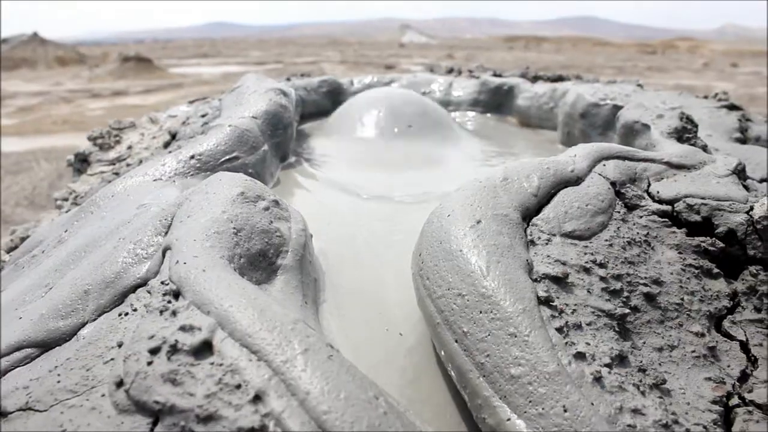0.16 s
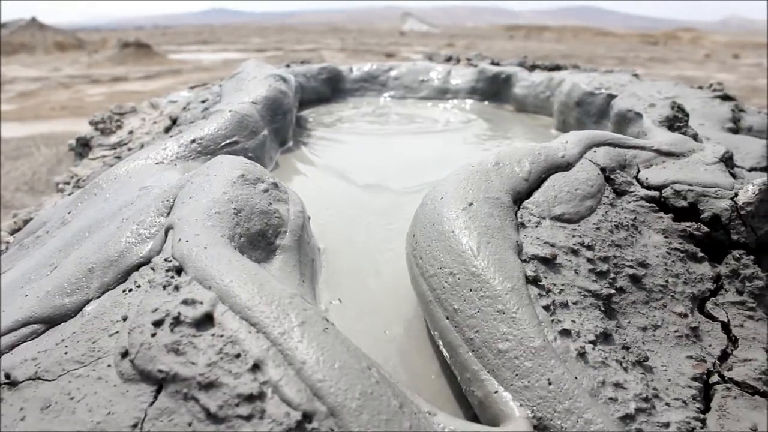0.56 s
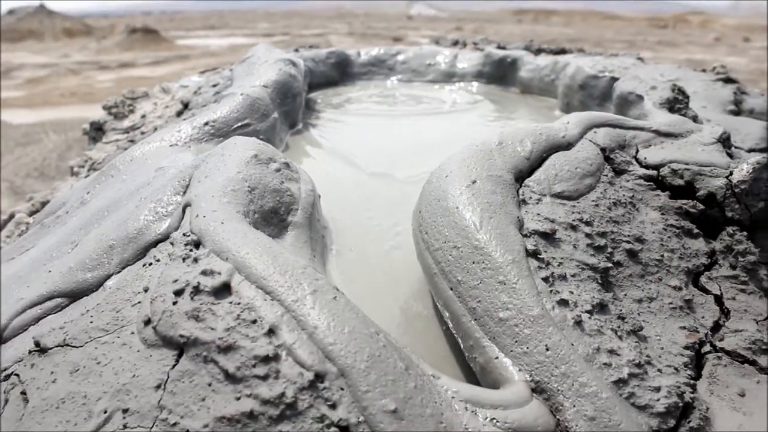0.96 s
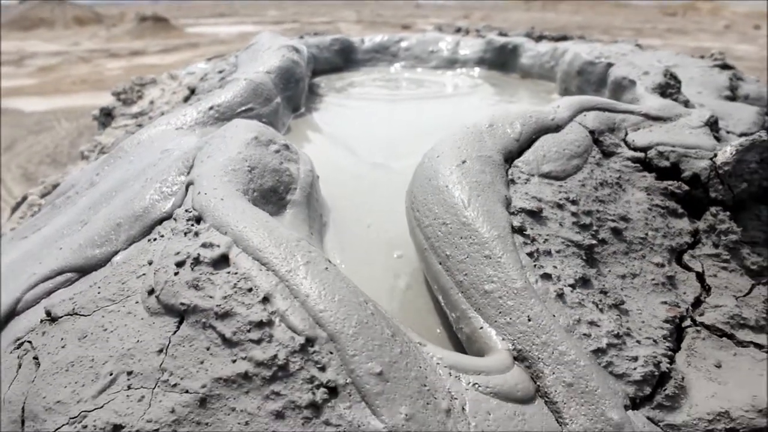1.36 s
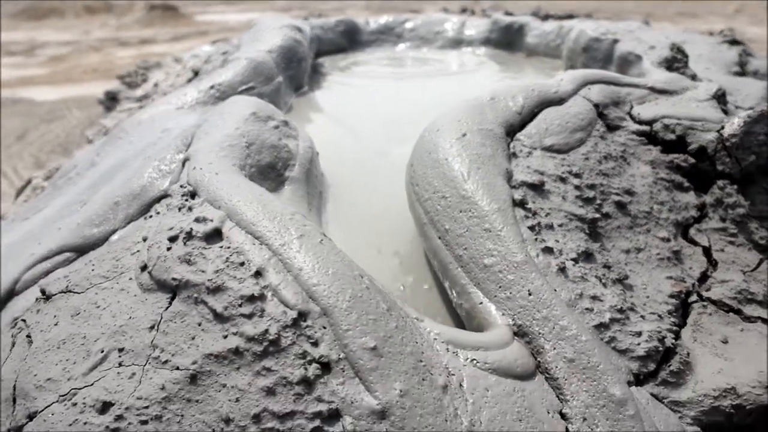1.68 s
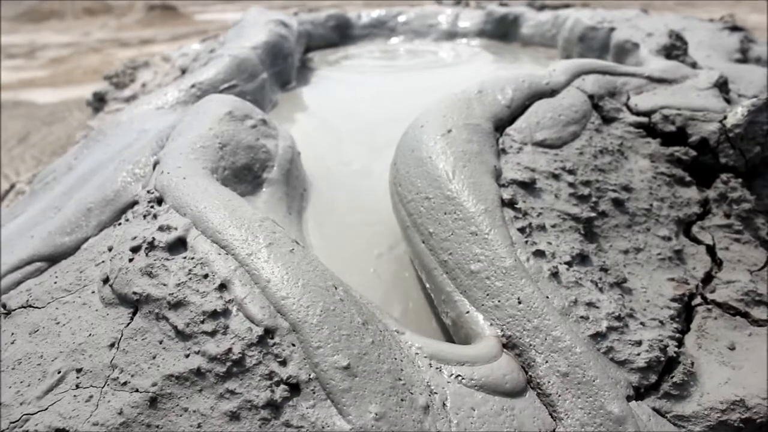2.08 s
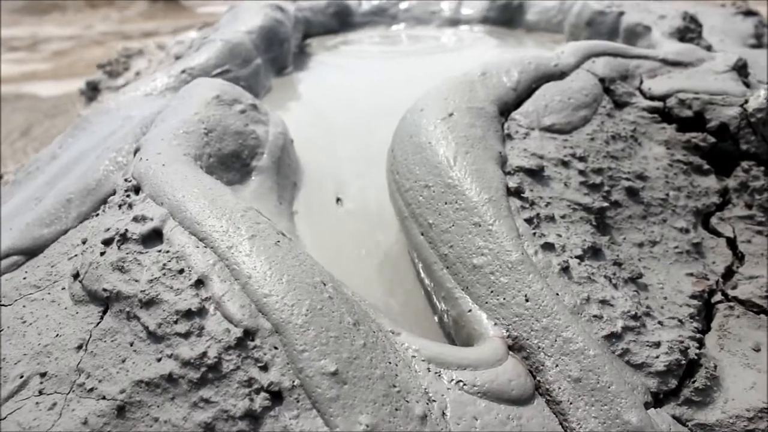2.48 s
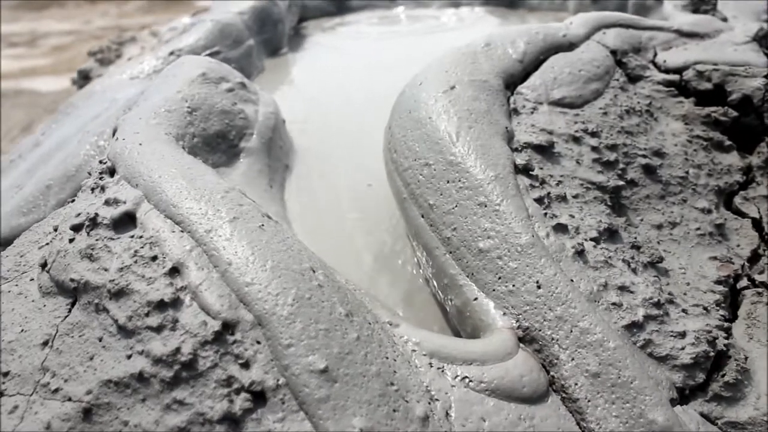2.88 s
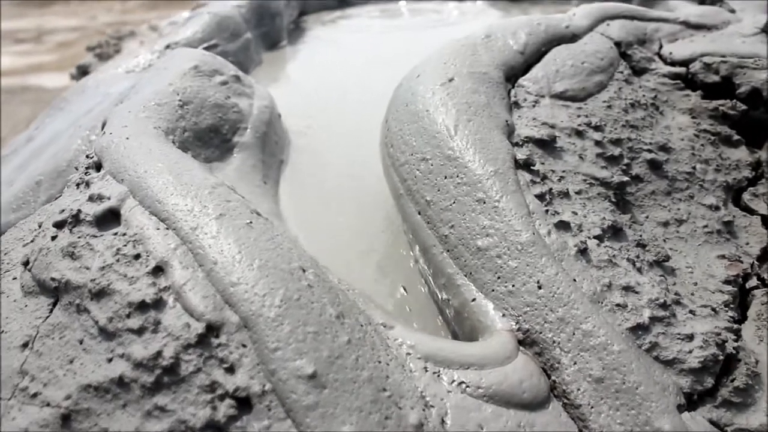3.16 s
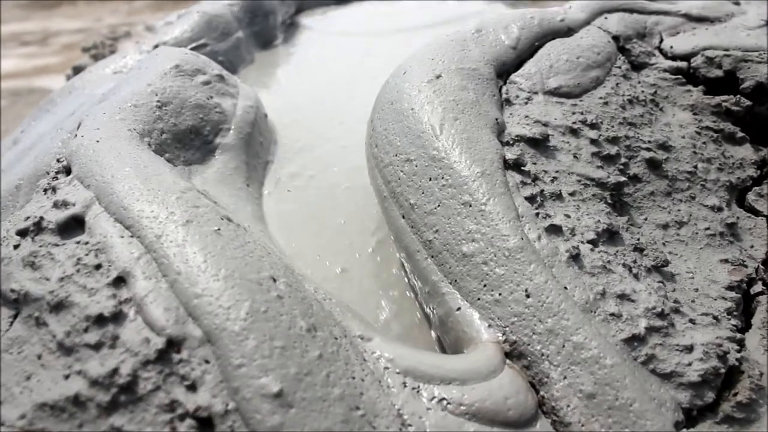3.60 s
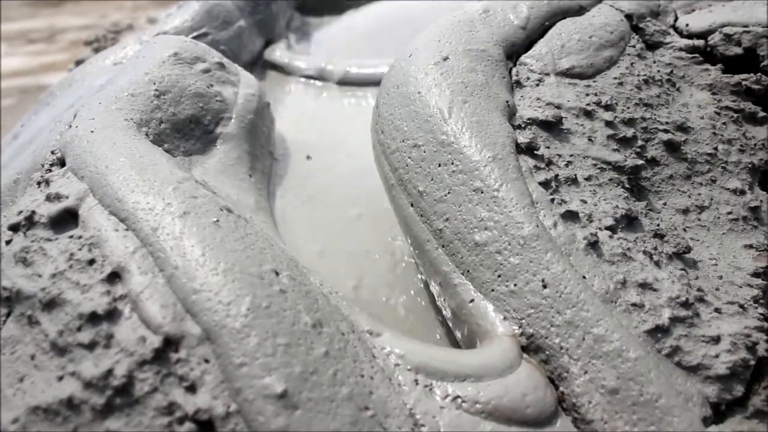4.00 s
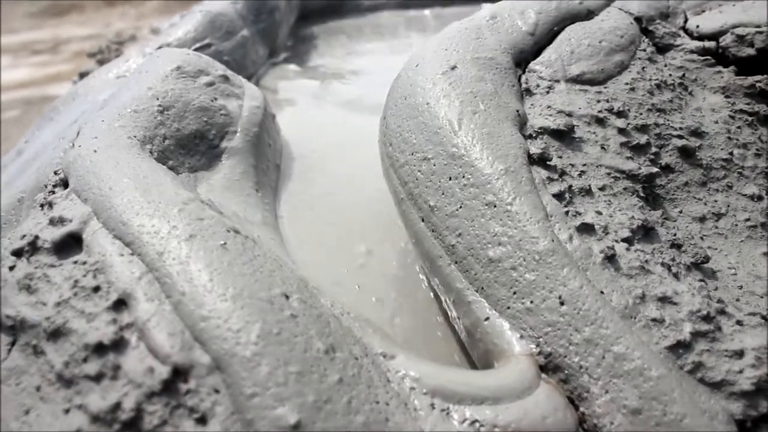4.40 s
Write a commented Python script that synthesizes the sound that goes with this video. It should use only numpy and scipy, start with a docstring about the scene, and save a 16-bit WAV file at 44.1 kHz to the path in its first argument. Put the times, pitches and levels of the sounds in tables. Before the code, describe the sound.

Liquid mud pool fizzes faintly over a low outdoor rumble, with sparse wet pops and one loud, crackling bubble burst near the end.

```python
"""A low rumble of outdoor air with a far hum runs throughout, under the fizz of a pool of liquid mud,
heard from close by in its small crater. Pops and gulps are pitched tones, drips are longer-ringing pops;
domes tear in sprays of random snaps, and gas sighs as a sputter of tiny ringing bubbles.
Fingers tap and rub the case of the hand-held microphone, which rings in its own modes. A thin tone
wavers faintly, breeze puffs in the bass, and the crater rim scatters back a short, dull tail."""
import sys
import numpy as np
from scipy import signal
from scipy.fft import rfft, irfft
from scipy.io import wavfile

SR = 44100
rng = np.random.default_rng(int(sys.argv[2]) if len(sys.argv) > 2 else 0)


def inscribe(sig):
    """Save sig as 16-bit PCM at rate SR to the path in sys.argv[1].

    A 1-D sig is mono; a 2-D sig holds one channel per row.
    Samples are clipped to [-1, 1] before scaling.
    """
    pcm = np.round(np.clip(np.atleast_2d(sig).T, -1, 1) * 32767)
    wavfile.write(sys.argv[1], SR, pcm.astype(np.int16))


N = 200302
TIME = np.arange(N) / SR
CUTOFF_HZ = 15950   # top of the microphone's range

# All event levels are before the crater and the microphone; rms levels are at the top of the arch.
# Spectrum of the open air. Each row: frequency in Hz, relative level in dB.
AIR_COLOUR = [(25, -12), (50, -2.5), (62, -3), (80, -5.5), (120, 0.5), (180, 0.5), (235, -6.5), (320, -11),
              (480, -19), (650, -17.5), (900, -20), (1600, -21.5), (2800, -24), (5000, -26.5),
              (9000, -28.5), (13000, -32), (16000, -33.5)]
# Far hum in the rumble. Each row: centre in Hz, bandwidth in Hz, rms level in dB.
HUM_BANDS = [(130, 14, -60.5), (162.4, 7.8, -63.5), (224.3, 18, -66.5)]
# Liveliness of the surface fizz. Each row: time in seconds, drive level of the ticks in dB.
FIZZ_LEVELS = [(0, -44.5), (.7, -44), (2.2, -44), (2.7, -49.5), (3.6, -42.5), (3.86, -34.5), (4.15, -47),
               (4.54, -43)]
# Gas pockets snapping open, from dry ticks to ringing drips. Each row: start in seconds, peak level
# in dB, starting pitch in Hz, ring length to -60 dB in cycles of that pitch.
POPS = [(.0499, -39, 7000, 20), (.213, -23, 14000, 35), (.2487, -30, 9500, 41), (0.25, -30, 3650, 40),
        (0.2576, -18.5, 7650, 9.2), (.747, -30, 2800, 25), (0.751, -33.5, 3930, 34), (.771, -36, 2700, 17),
        (0.771, -34, 1400, 13), (0.7926, -36.5, 910, 7.6), (.876, -42, 7750, 45), (.9541, -40.5, 1730, 19),
        (1.342, -37.5, 5300, 6.3), (2.2994, -28.5, 7650, 7.8), (2.3481, -18, 8260, 11),
        (2.383, -32, 7000, 10), (2.4432, -44, 1900, 12), (2.6047, -22.5, 7900, 5.6),
        (3.3945, -32.5, 8060, 14), (3.401, -18.5, 14800, 13), (3.4708, -35, 7600, 18),
        (3.579, -27.5, 13200, 4.3), (3.5863, -26, 14000, 9.3), (3.6935, -23, 15200, 32),
        (3.745, -21.5, 2870, 14), (3.7495, -15.5, 4870, 3), (3.7542, -17, 3660, 4.9),
        (3.805, -25.5, 8550, 26), (3.828, -9.5, 9900, 8.5), (3.8331, -11, 8550, 3.8),
        (3.8613, -20.5, 1570, 14), (3.8611, -17, 3420, 27), (3.877, -15.5, 636, 3.5),
        (3.8778, -6.5, 13000, 5.8), (3.8823, -20.5, 710, 5.4), (3.8842, -9.5, 2380, 11),
        (3.8859, -5, 13800, 25), (3.887, -11.5, 11300, 16), (3.9011, -25, 1860, 17),
        (4.0488, -29, 12800, 18)]
# Fingers tapping the case. Each row: start in seconds, click level in dB, settling time in ms.
TAPS = [(0.096, -48, 15), (2.5028, -47.5, 35), (2.722, -43, 13), (3.123, -39, 5.2), (3.4051, -40, 7.9),
        (3.59, -38, 21), (4.063, -32, 21)]
# Modes of the microphone case. Each row: pitch in Hz, gain in dB, decay time to -60 dB in ms.
CASE_MODES = [(1350, -30, 15), (1598, -6, 35), (1870, -5, 7.6), (2700, 3, 12.7), (3650, -29, 6)]
# Spectrum of skin on the case. Each row: frequency in Hz, relative level in dB.
RUB_COLOUR = [(500, -9.5), (900, -6.5), (1550, 3.5), (2200, -2.5), (2650, 5), (3400, -15), (5000, -12),
              (9000, -13.5)]
# Large cavities ringing under the mud. Each row: start in seconds, peak level of the main tone in dB,
# first pitch in Hz, last pitch in Hz, length in ms, overtone level against the main tone in dB.
GULPS = [(0.1832, -40.5, 350, 900, 18.4, -15), (.765, -43.5, 430, 820, 15, -4),
         (3.1829, -22.5, 207, 214, 19.8, -14.5), (3.2624, -31.5, 253, 370, 14.7, 0),
         (3.3831, -45, 380, 520, 7, -17), (3.753, -41, 188, 237, 22.5, -18),
         (3.770, -33.5, 253, 490, 18.5, -10), (3.876, -32, 399, 475, 11.45, -13)]
# Mud skin tearing into spray. Each row: start in seconds, rms level in dB, length in ms,
# treble tilt in dB per octave.
SPRAYS = [(.237, -57, 10, 3), (0.2521, -41, 9, 1.5), (0.291, -45, 8.3, -0.5), (0.5593, -49, 11, -2.5),
          (0.682, -43.5, 6.4, 1), (0.7466, -34, 9, 0.5), (2.386, -49, 7.9, -2.5), (2.4405, -48, 7.1, 3.5),
          (2.597, -51, 20, 0), (2.873, -50.5, 9, -1), (3.3628, -48, 11.4, 2), (3.7486, -32.5, 15, 1.5),
          (3.77, -41, 6.2, -4.5), (3.826, -30.5, 16.7, 1.5), (3.850, -29.5, 10, 1), (3.858, -24, 11.7, 0.5),
          (3.867, -21.5, 11, 13.5), (3.8808, -20, 11.4, 2.3)]
# Spectrum of spray before its tilt. Each row: frequency in Hz, relative level in dB.
SPRAY_COLOUR = [(300, 0), (700, -1), (1100, 0.5), (2400, 2.5), (4000, 0.5), (6500, -0.5), (10000, -1),
                (15000, -1.5)]
# Spectrum of bubbles freed by a tear. Each row: frequency in Hz, relative level in dB.
FREED_COLOUR = [(300, -7), (900, -8.5), (1500, 1), (2200, 5), (3400, -3), (5000, 0), (10000, -16)]
# Soft rushes of escaping gas. Each row: start in seconds, rms level in dB, length in ms.
SIGHS = [(.750, -49.5, 70), (.952, -48, 107), (1.17, -56, 150), (1.245, -49.5, 115), (1.38, -45, 110),
         (1.78, -58.5, 56), (3.765, -53, 200)]
# Spectrum of the sighs. Each row: frequency in Hz, relative level in dB.
SIGH_COLOUR = [(150, -1), (350, 0), (700, 0.5), (1000, -2), (1500, 4.5), (2000, -3.5), (3500, -6.5),
               (6500, -13), (10000, -18), (16000, -34)]
# A thin, faint tone. Each row: start in seconds, rms level in dB, length in ms.
WHINE = [(1.3, -71, 1200)]
# Puffs of breeze. Each row: start in seconds, rms level in dB, length in ms.
BREEZE_PUFFS = [(1.52, -49, 27), (2.69, -52, 220), (4.39, -50, 165)]
# Spectrum of the breeze. Each row: frequency in Hz, relative level in dB.
BREEZE_COLOUR = [(25, -10), (60, -2), (110, -7), (250, -9.5), (700, -49)]
# Fingers sliding on the case. Each row: start in seconds, rms level in dB, length in ms.
RUBS = [(2.475, -54.5, 245), (2.677, -56.5, 56), (3.05, -60.5, 130)]


def from_db(db):
    """Decibels to gain."""
    return 10 ** (np.asarray(db) / 20)


def rms_one(x):
    """Scale to unit rms."""
    return x / np.sqrt(np.mean(x ** 2) + 1e-20)


def seconds(ms):
    """Milliseconds to seconds."""
    return ms / 1000


def add(out, s, sound):
    """Mix a sound in at s seconds."""
    at = max(round(s * SR), 0)
    out[at:at + len(sound)] += sound[:max(N - at, 0)]


def coloured(x, points, tilt_db=0):
    """Give x a smooth spectrum, tilted in dB per octave; rms 1."""
    hz, level_db = np.transpose(points)
    octave = np.log2(np.maximum(np.fft.rfftfreq(len(x), 1 / SR), 10))
    curve_db = np.interp(octave, np.log2(hz), level_db) + tilt_db * octave
    return rms_one(irfft(rfft(x) * from_db(curve_db), len(x)))


def ring(clicks, hz, t60):
    """A damped resonance: a unit click sets off a sine of height 1, down 60 dB after t60 seconds."""
    r = from_db(-60 / (t60 * SR))
    w = 2 * np.pi * hz / SR
    return signal.lfilter([0, np.sin(w)], [1, -2 * r * np.cos(w), r * r], clicks + 1e-18)


def grains(per_s, spread_db):
    """Random clicks of either sign, many small and a few large."""
    sizes = from_db(spread_db * np.minimum(rng.exponential(1, N), 3))
    struck = rng.random(N) < per_s / SR
    return sizes * rng.choice([-1, 1], N) * struck


def swell(ms, skew):
    """One arch of loudness; a skew under 1 brings its top forward."""
    progress = np.linspace(0, 1, max(round(seconds(ms) * SR), 8))
    return np.sin(np.pi * progress ** skew)


def swells(rows, skew):
    """A level curve made of arches."""
    out = np.zeros(N)
    for s, db, ms in rows:
        add(out, s, from_db(db) * swell(ms, skew))
    return out


def glide(first_hz, last_hz, ms, skew):
    """A sine that slides between two pitches under one arch."""
    arch = swell(ms, skew)
    hz = np.geomspace(first_hz, last_hz, len(arch))
    return arch * np.sin(2 * np.pi * np.cumsum(hz) / SR)


def flicker(per_s, spread_db):
    """A gain that wanders at random; rms 1."""
    wander = coloured(rng.standard_normal(N), [(per_s, 0), (4 * per_s, -80)])
    return rms_one(from_db(spread_db * wander))


def crackle(per_s, cycles, pitch_count=14):
    """Random grains, each ringing for a few cycles at one of many pitches, the high ones more often."""
    pitches = np.geomspace(300, 9000, pitch_count)
    odds = np.sqrt(pitches) / np.sqrt(pitches).sum()
    dealt = rng.choice(pitch_count, N, p=odds)
    clicks = grains(per_s, spread_db=3.0)
    out = np.zeros(N)
    for k, hz in enumerate(pitches):
        out += np.sqrt(hz) * rms_one(ring(clicks * (dealt == k), hz, cycles / hz))
    return rms_one(out)


def rumble(rms_db=-52.5):
    """Open air as steady noise: low rumble and faint hiss."""
    return from_db(rms_db) * coloured(rng.standard_normal(N), AIR_COLOUR)


def far_hum():
    """Noise through narrow resonances gives a distant, unsteady hum."""
    out = np.zeros(N)
    for hz, width_hz, db in HUM_BANDS:
        t60 = np.log(1000) / (np.pi * width_hz)   # a narrower band rings longer
        out += from_db(db) * rms_one(ring(rng.standard_normal(N), hz, t60))
    return out


def fizz(mean_per_s=130, doubling_db=5, low_cut_hz=12000, hz=13800, t60_ms=0.43):
    """Pinhead bubbles tick high in the treble; each rise of doubling_db also doubles their rate."""
    db = np.interp(TIME, *np.transpose(FIZZ_LEVELS))
    per_s = mean_per_s * 2 ** ((db - db.mean()) / doubling_db)
    ticks = grains(per_s, spread_db=5.5) * from_db(db)
    high_pass = signal.butter(2, low_cut_hz, "high", fs=SR, output="sos")
    return ring(signal.sosfilt(high_pass, ticks), hz, seconds(t60_ms))


def stray_pops(per_s=2, mid_db=-34.5, spread_db=4, low_hz=7000, high_hz=14000, cycles=5.8, count=60):
    """Faint ticks all over the pool at random moments and pitches, as rows like those of POPS."""
    gap, size, pitch = rng.random((count, 3)).T
    times = np.cumsum(-np.log(1 - gap)) / per_s
    levels_db = mid_db + spread_db * (2 * size - 1)
    pitches = low_hz * (high_hz / low_hz) ** pitch
    return [(s, db, hz, cycles) for s, db, hz in zip(times, levels_db, pitches) if s < N / SR]


def pops(rise=0.12, opening_cycles=0.31):
    """Each pocket opens within a cycle and rings for a few, its pitch rising as the hole widens."""
    out, t = np.zeros(N), TIME[:SR // 30]
    for s, db, hz, cycles in POPS + stray_pops():
        age = t * hz / cycles   # 1 when the ring is down 60 dB
        phase = 2 * np.pi * np.cumsum(hz * (1 + rise * np.minimum(age, 1))) / SR
        opening = 1 - np.exp(-t * hz / opening_cycles)
        pop = opening * from_db(-60 * age) * np.sin(phase)
        add(out, s, from_db(db) * pop / np.max(np.abs(pop)))
    return out


def finger_friction():
    """Skin dragging over the case: a dense crackle in the colour of the rubs; rms 1."""
    return coloured(crackle(per_s=2500, cycles=7.3), RUB_COLOUR)


def case_taps(settle_db=-15, scuff_db=-14):
    """A fingertip's click and tiny settling slips ring the modes of the case, with a scuff of skin."""
    clicks = np.zeros(N)
    for s, db, _ in TAPS:
        add(clicks, s, from_db([db]))
    settling = swells(TAPS, skew=0.27)
    slips = from_db(settle_db) * settling * grains(per_s=790, spread_db=1.5)
    out = from_db(scuff_db) * settling * finger_friction()
    for hz, db, t60_ms in CASE_MODES:
        out += from_db(db) * ring(clicks + slips, hz, seconds(t60_ms))
    return out


def gulps():
    """A big cavity sounds a gliding tone, a brief overtone and a low heave of mud, then sinks back."""
    overtone_ratio, overtone_share = 2.08, 0.8   # pitch and length against the gulp
    heave_db, heave_ratio = -11, 0.55   # level and pitch against the gulp
    rebound_db, rebound_stretch, rebound_sag = -13, 0.94, 0.675   # level, length, final pitch ratio
    out = np.zeros(N)
    for s, db, first_hz, last_hz, ms, overtone_db in GULPS:
        main = glide(first_hz, last_hz, ms, skew=0.86)
        overtone = glide(overtone_ratio * first_hz, overtone_ratio * last_hz,
                         ms * overtone_share, skew=0.23)
        heave = glide(heave_ratio * first_hz, heave_ratio * last_hz, ms, skew=0.55)
        rebound = glide(last_hz, last_hz * rebound_sag, ms * rebound_stretch, skew=0.35)
        add(out, s, from_db(db) * main)
        add(out, s, from_db(db + overtone_db) * overtone)
        add(out, s, from_db(db + heave_db) * heave)
        add(out, s + seconds(ms), from_db(db + rebound_db) * rebound)
    return out


def tears():
    """A tearing skin sheds thousands of tiny snaps a second, inside a longer, fainter mist."""
    mist_db, mist_stretch, mist_lead = -18.5, 3.7, 1.1   # level; length, head start in tear lengths
    out, snaps = np.zeros(N), grains(per_s=12000, spread_db=10.5)
    for (s, db, ms, tilt_db), share in zip(SPRAYS, np.array_split(snaps, len(SPRAYS))):
        spatter = coloured(share[:8192], SPRAY_COLOUR, tilt_db)
        tear = swell(ms, skew=0.31)
        mist = swell(ms * mist_stretch, skew=1.0)
        add(out, s, from_db(db) * tear * rms_one(spatter[:len(tear)]))
        mist_start = s - seconds(ms) * mist_lead
        add(out, mist_start, from_db(db + mist_db) * mist * rms_one(spatter[-len(mist):]))
    return out


def freed_bubbles(against_spray_db=-5):
    """Each tear sets bubbles ringing at many pitches, under an arch as long as the tear."""
    bubbles = coloured(crackle(per_s=2200, cycles=23), FREED_COLOUR)
    levels = swells([row[:3] for row in SPRAYS], skew=0.65)
    return from_db(against_spray_db) * levels * bubbles


def sighs():
    """Gas rushes out unevenly through wet mud, sputtering in countless tiny bubbles."""
    sputter = coloured(crackle(per_s=5000, cycles=5.8), SIGH_COLOUR)
    return swells(SIGHS, skew=0.75) * flicker(per_s=63, spread_db=2.0) * sputter


def whine(hz=2000, t60=0.18):
    """Noise through one narrow resonance gives a thin, wavering tone."""
    return swells(WHINE, skew=0.59) * rms_one(ring(rng.standard_normal(N), hz, t60))


def breeze():
    """Puffs of moving air as arches of deep noise."""
    return swells(BREEZE_PUFFS, skew=0.79) * coloured(rng.standard_normal(N), BREEZE_COLOUR)


def finger_rubs():
    """A sliding finger scratches the case in fits, as friction under a wandering gain."""
    return swells(RUBS, skew=0.53) * flicker(per_s=26, spread_db=2.5) * finger_friction()


def crater(x, t60=0.18, scatter_db=-26.0, dull_hz=3500):
    """The rough rim scatters back a short, dull, faint tail of decaying noise."""
    t = TIME[:SR // 5]
    echoes = rng.standard_normal(len(t)) * from_db(-60 * t / t60)
    low_pass = signal.butter(1, dull_hz, fs=SR, output="sos")
    echoes = signal.sosfilt(low_pass, echoes / np.linalg.norm(echoes))
    return x + from_db(scatter_db) * signal.fftconvolve(x, echoes)[:N]


def scene():
    """The open air, the mud in its crater and the hand on the microphone."""
    mud = fizz() + pops() + gulps() + tears() + freed_bubbles() + sighs()
    surroundings = rumble() + far_hum() + whine() + breeze()
    hand = case_taps() + finger_rubs()
    return (crater(mud) + surroundings + hand)[None]


def record(dry, low_cut_hz=35):
    """The microphone loses the deepest bass; the top is cut steeply."""
    high_pass = signal.butter(2, low_cut_hz, "high", fs=SR, output="sos")
    steep_cut = signal.ellip(10, .2, 70, CUTOFF_HZ, fs=SR, output="sos")
    return signal.sosfilt(steep_cut, signal.sosfilt(high_pass, dry))


dry = scene()
out = record(dry)
inscribe(out)
```